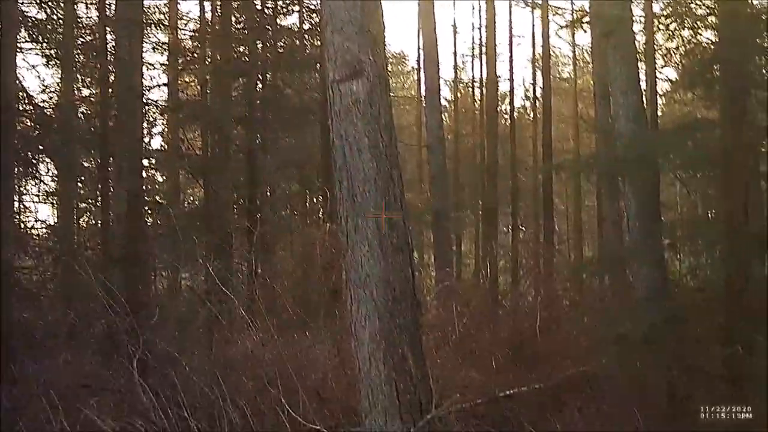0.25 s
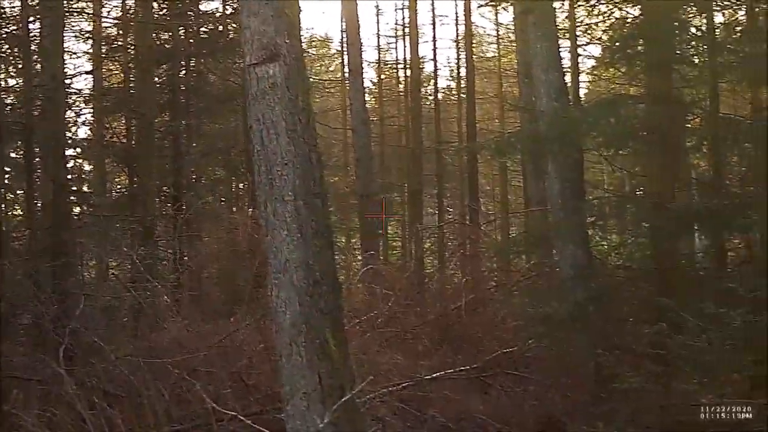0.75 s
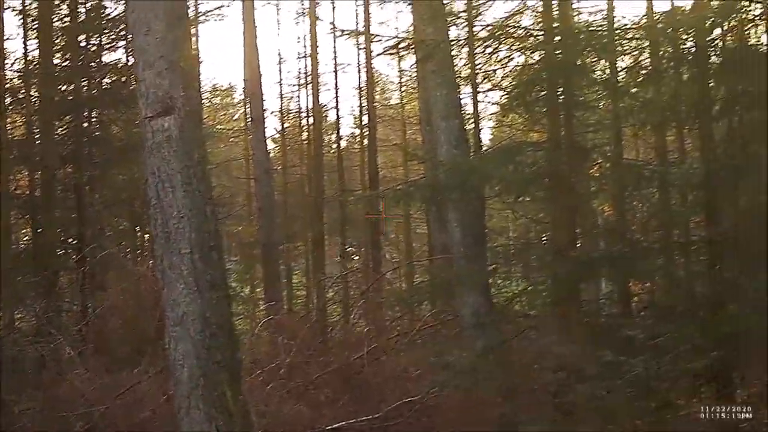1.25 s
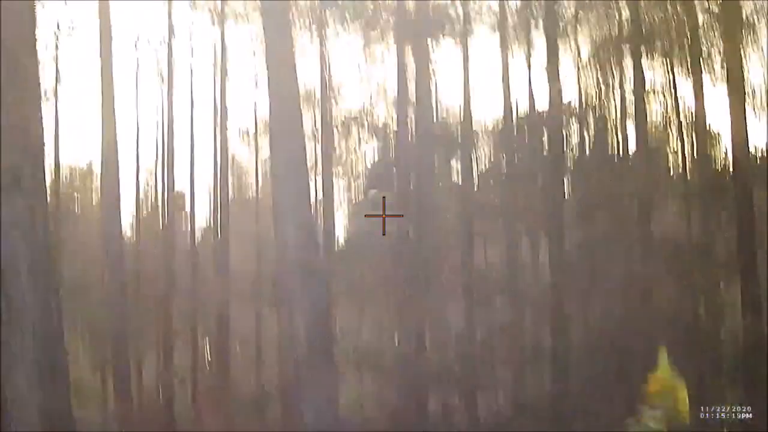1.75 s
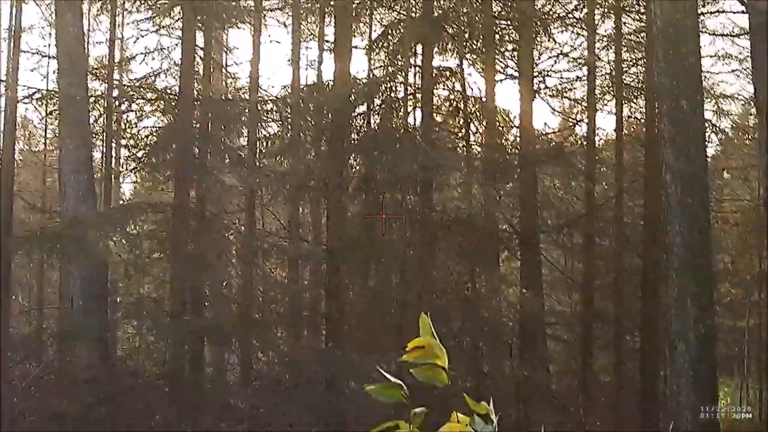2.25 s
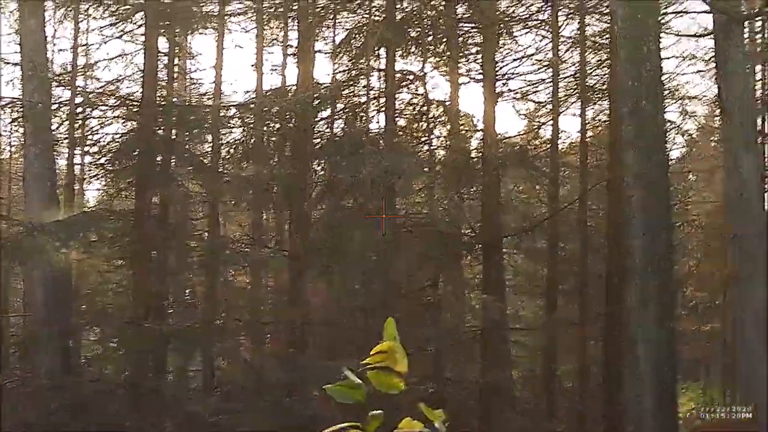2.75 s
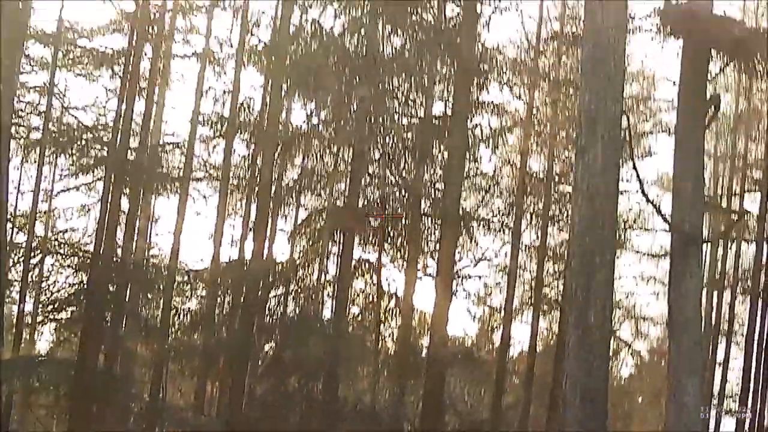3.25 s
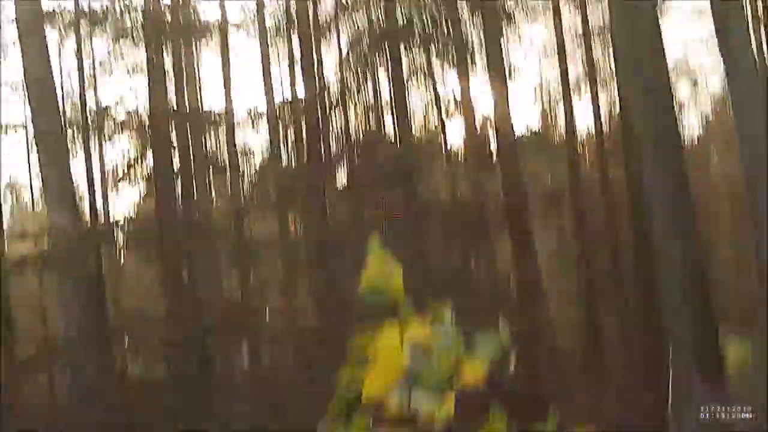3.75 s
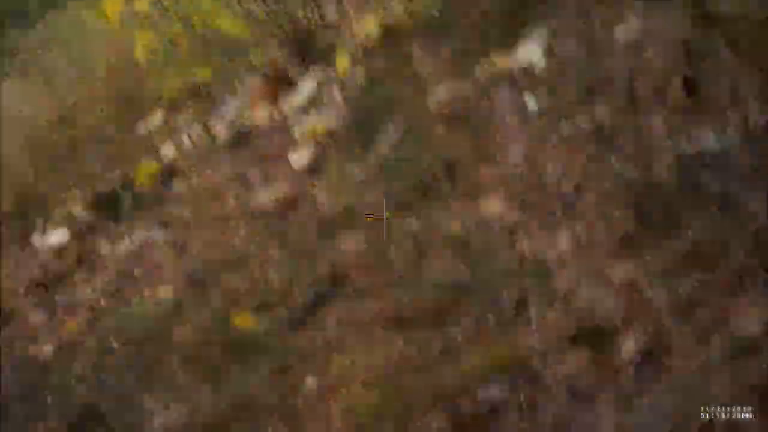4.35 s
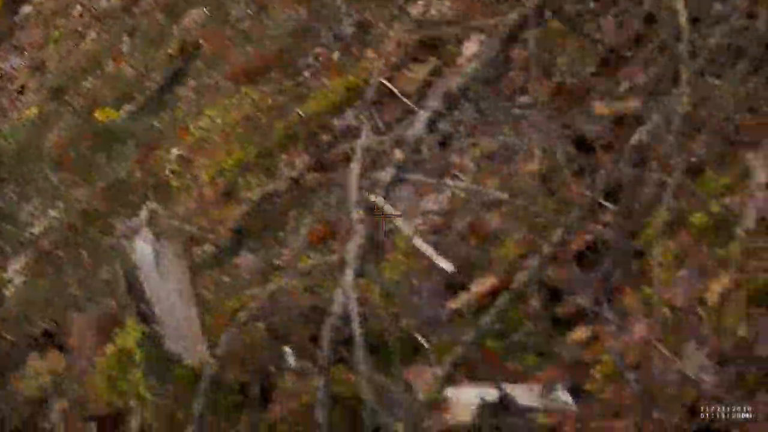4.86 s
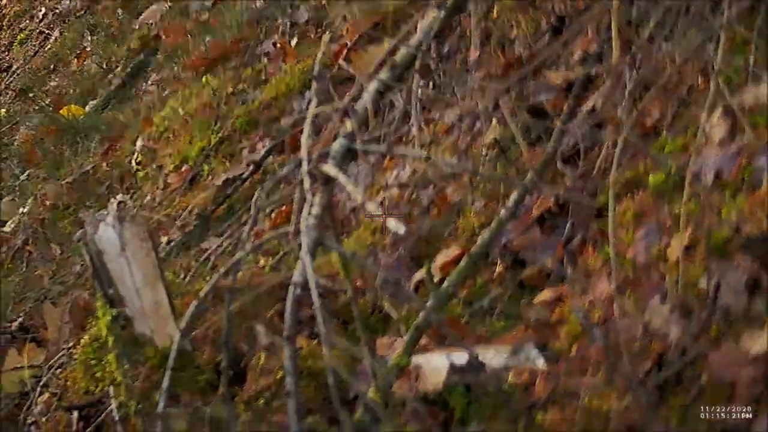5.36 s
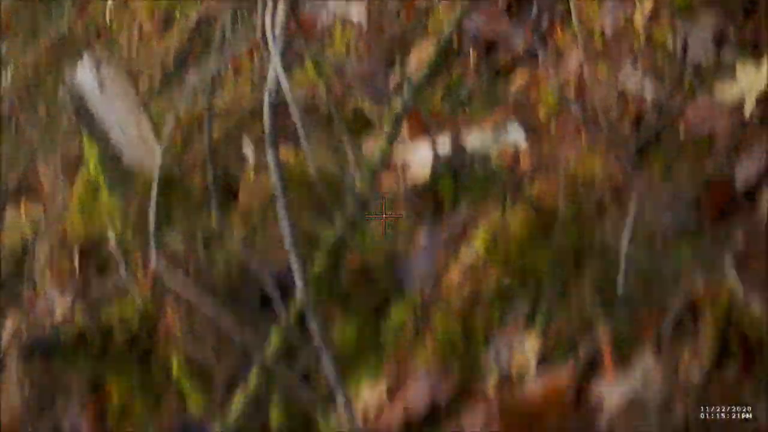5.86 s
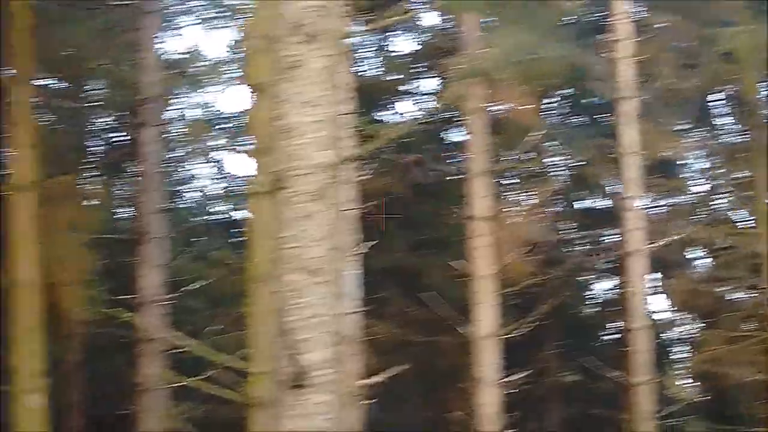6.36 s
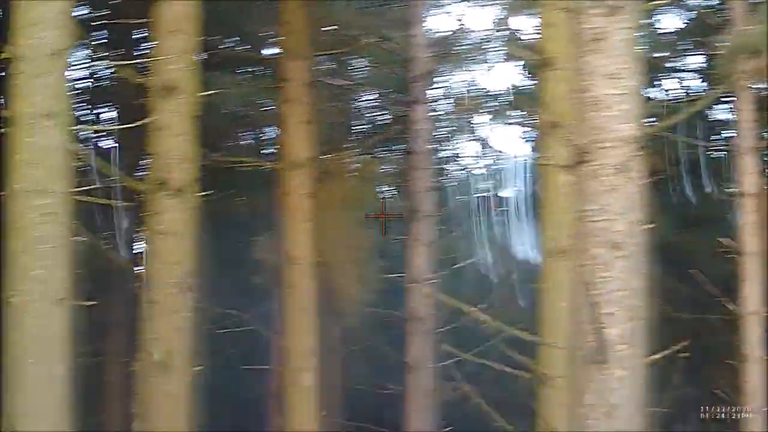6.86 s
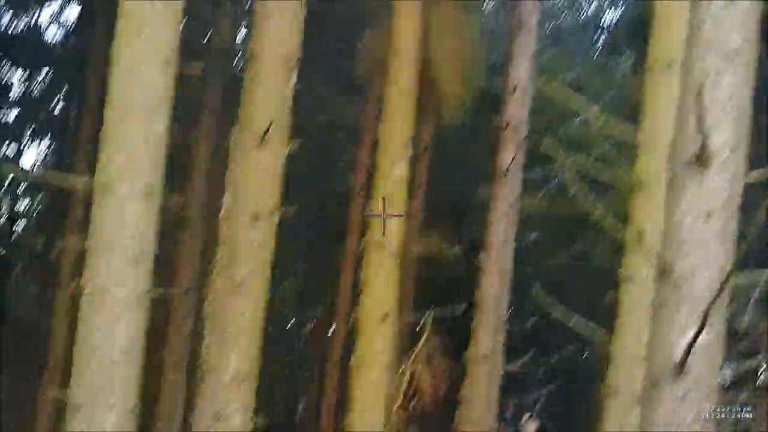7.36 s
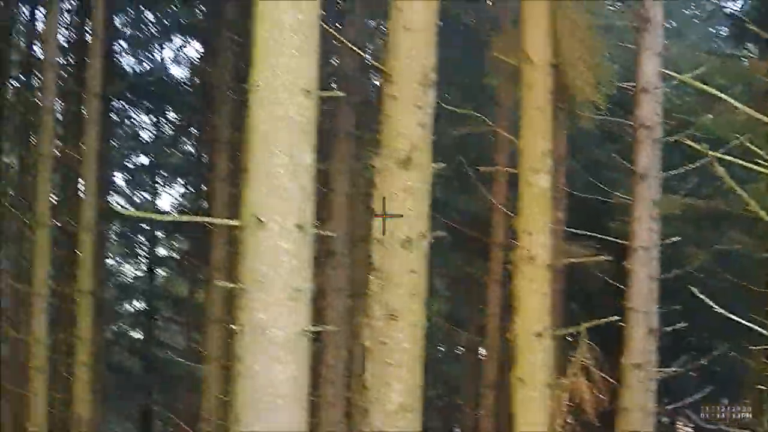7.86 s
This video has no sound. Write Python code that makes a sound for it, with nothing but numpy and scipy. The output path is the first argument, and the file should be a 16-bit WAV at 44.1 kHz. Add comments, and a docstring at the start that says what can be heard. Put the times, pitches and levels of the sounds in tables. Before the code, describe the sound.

Two overloading shotgun blasts echo through a forest, with quiet knocks, rubbing and steel clacks from the gun between them.

```python
"""First comes the dying echo of a shotgun shot in a conifer wood, heard by a small camera on the barrel.
Two more shots follow. Each blast jams the microphone amplifier at its limits; as it recovers,
the echo from the tree trunks rolls away, humming in the air inside the barrel.
Between shots, hands knock and rub the gun, its steel action clacks open and a tight part squeaks."""
import sys
import numpy as np
from scipy import signal
from scipy.fft import rfft, irfft, next_fast_len
from scipy.io import wavfile

SR = 44100
rng = np.random.default_rng(int(sys.argv[2]) if len(sys.argv) > 2 else 0)


def log_audio(samples):
    """Write samples as a 16-bit WAV file to the path given in sys.argv[1]."""
    # one column per channel
    frames = np.atleast_2d(samples).T
    # limit to full scale, then quantise
    limited = np.clip(frames, -1, 1)
    pcm = np.round(limited * 32767).astype(np.int16)
    wavfile.write(sys.argv[1], SR, pcm)


N = 357651
LEAD = SR // 2  # extra samples before time zero, to hold the earliest shot
T = np.arange(-LEAD, N) / SR  # scene time in seconds
AFTER = np.arange(SR // 3) / SR  # seconds since a hit
CLICK = signal.unit_impulse(len(AFTER))


def from_db(db):
    """Turn decibels into a number to multiply by."""
    return 10 ** (np.asarray(db) / 20)


def rms_one(x):
    """Scale a sound so its average strength (rms) is 1."""
    return x / np.sqrt(np.mean(x ** 2) + 1e-20)


def add(out, start, sound):
    """Mix a sound in at a start time in seconds."""
    i = LEAD + round(start * SR)
    out[i:i + len(sound)] += sound[:len(out) - i]


def low_pass(x, hz, order=2):
    """Soften everything above hz."""
    return signal.sosfilt(signal.butter(order, min(hz, .45 * SR), fs=SR, output="sos"), x)


def high_pass(x, hz, order=1):
    """Soften everything below hz."""
    return signal.sosfilt(signal.butter(order, hz, "high", fs=SR, output="sos"), x)


def filtered(x, gain_at):
    """Turn each frequency up or down by gain_at(hz)."""
    size = next_fast_len(len(x))
    hz = np.maximum(np.fft.rfftfreq(size, 1 / SR), 1)
    return irfft(rfft(x, size) * gain_at(hz), size)[:len(x)]


def ring(x, hz, t60):
    """Each push in x starts a pure tone that fades by 60 dB in t60 seconds."""
    decay, step = from_db(-60 / (t60 * SR)), 2 * np.pi * hz / SR
    return signal.lfilter([0, np.sin(step)], [1, -2 * decay * np.cos(step), decay * decay], x + 1e-18)


# The notes of the air in the barrel. Each row: pitch in Hz, width in Hz, boost in dB.
BARREL_NOTES = [(197, 22, 19), (604.7, 46, 17.5), (1010, 110, 3)]
def through_barrel(colour):
    """Noise with a given balance of low and high, boosted where the barrel hums like a closed pipe."""
    points, level_db = np.transpose(colour)
    balance = lambda hz: from_db(np.interp(np.log(hz), np.log(points), level_db))
    plain = filtered(rng.standard_normal(len(T)), balance)
    boost = lambda hz: 1 + sum(from_db(db) ** 2 / (1 + (2 * (hz - pitch) / width) ** 2)
                               for pitch, width, db in BARREL_NOTES)
    return rms_one(filtered(plain, lambda hz: np.sqrt(boost(hz))))


# The tone of a fresh echo. Each row: frequency in Hz, relative level in dB.
ECHO_TONE = [(30, -16), (80, -17), (140, -5), (280, -9), (420, -17), (750, -15), (1200, -20), (1700, -26),
             (2300, -32.5), (3000, -40), (3800, -43), (5000, -54), (7500, -59)]
# A far slope returns each shot once more: delay in seconds, spread in seconds, relative level in dB.
SLOPE_ECHO = (1.44, .07, -27)
def forest_echo(fall_db=39, dying_db_per_s=1.0, treble_loss_db=8.0, flutter_db=2.4):
    """Trunks scatter each shot back. The echo holds, then fades, duller the further it has travelled."""
    level, age = np.zeros((2, len(T)))
    far_s, far_spread_s, far_db = SLOPE_ECHO
    for fired, *_, echo_db, hold_s in GUNSHOTS:
        since = np.maximum(T - fired, 0)
        # after the hold, the echo loses fall_db each time it gets ten times older
        faded_db = fall_db * np.log10(np.hypot(1, (since / hold_s) ** 2)) / 2 + dying_db_per_s * since
        far = from_db(far_db) * np.exp(-((since - far_s) / far_spread_s) ** 2)
        level = np.where(T >= fired, from_db(echo_db) * np.hypot(from_db(-faded_db), far), level)
        age = np.where(T >= fired, since, age)
    noise = through_barrel(ECHO_TONE)
    travel = np.log(np.maximum(age, .22) / .33)
    bands_hz, out = np.geomspace(500, 8000, 5), 0
    for centre, share in zip(bands_hz, np.eye(len(bands_hz))):
        band = filtered(noise, lambda hz: np.interp(hz, bands_hz, share))
        out += band * from_db(-treble_loss_db * travel * (centre - bands_hz[0]) / (centre + 1500))
    flutter = rms_one(low_pass(rng.standard_normal(len(T)), 35))
    return level * out * from_db(flutter_db * flutter)


# The tone of the still wood. Each row: frequency in Hz, relative level in dB.
AIR_TONE = [(25, 3), (70, -8), (140, -5), (300, -17), (600, -21), (1100, -23), (2000, -31), (7500, -44)]
def still_air():
    """The faint, steady hush of the wood hums in the barrel."""
    return from_db(-60) * through_barrel(AIR_TONE)


# The gun's low and high notes. Each row: pitch in Hz, relative level in dB, ring time in seconds.
KNOCK_NOTES = [(425, -13, .03), (600, -6, .025), (754, -2, .035), (960, 1, .03), (1096, 2, .03),
               (1300, -4, .04), (1570, -8, .05), (1890, -9, .06), (2060, -9, .05), (2220, -9, .045)]
TICK_NOTES = [(2700, -4, .025), (3220, -1, .05), (3480, 0, .065), (4010, -3, .06), (4990, -6, .02),
              (5500, -8, .02), (6360, -13, .06), (7150, -13, .025)]
def strike(notes, rattle_s, grit, soft_hz, rise_s=.0003, uneven_db=2.0):
    """A hit chatters and rings each note by a chance amount; grit mixes in the chatter itself."""
    force = rng.standard_normal(len(AFTER)) * np.exp(-AFTER / rattle_s) * (1 - np.exp(-AFTER / rise_s))
    force = high_pass(force, notes[0][0], order=2)  # stiff steel passes little below its lowest note
    body = sum(from_db(db + uneven_db * rng.standard_normal()) * (-1) ** k * rms_one(ring(force, hz, t60))
               for k, (hz, db, t60) in enumerate(notes))
    chatter = rms_one(low_pass(force, notes[-1][0]))
    sound = low_pass(rms_one(body) + grit * chatter, soft_hz)
    return sound / np.sqrt(np.mean(sound[:SR // 100] ** 2))  # strength 1 over the first 10 ms


# Light touches. Each row: time in seconds, knock and tick levels in dB before the gains below.
TOUCHES = [(0.249, -37, -52), (2.137, -29, -59), (2.568, -38, -48.5), (2.647, -38, -64), (2.672, -36, -58),
           (4.078, -48, -76), (4.161, -40, -70), (4.202, -38, -58), (4.216, -43, -70), (4.726, -48, -71),
           (5.02, -40, -70), (5.17, -51, -72), (5.307, -33, -63), (5.649, -43, -80), (5.729, -49, -80),
           (5.927, -50, -80), (6.203, -36, -71), (7.526, -36, -44), (7.579, -35, -50), (7.613, -27, -46),
           (7.641, -33, -41.5), (7.674, -31, -58)]
def touches(knock_gain_db=-9.0, tick_gain_db=-6.5):
    """Hands and fittings tap the gun, each with a dull knock and a small tick."""
    out = np.zeros(len(T))
    for time, knock_db, tick_db in TOUCHES:
        knock = strike(KNOCK_NOTES, rattle_s=.007, grit=.35, soft_hz=750, rise_s=.002, uneven_db=3)
        tick = strike(TICK_NOTES, rattle_s=.005, grit=1.2, soft_hz=4500, rise_s=.002, uneven_db=4)
        add(out, time - .003, from_db(knock_db + knock_gain_db) * knock)
        add(out, time - .001, from_db(tick_db + tick_gain_db) * tick)
    return out


# Soft bumps. Each row: start in seconds, barrel level in dB, stock level in dB.
BUMPS = [(0.371, -33, -32), (2.136, -17, -34), (5.31, -26, -38), (5.389, -42, -28), (5.56, -29, -21),
         (5.649, -50, -36), (6.203, -35, -37), (7.378, -19, -26)]
def thuds(overtone_loss_db=7.0, soft_hz=800):
    """A bump sets the barrel's air and the stock (the gun's shoulder piece) booming."""
    out = np.zeros(len(T))
    barrel = sum(from_db(-overtone_loss_db * k) * ring(CLICK, hz, t60=2.8 / width)
                 for k, (hz, width, _) in enumerate(BARREL_NOTES))
    stock = ring(CLICK, hz=132, t60=.11)
    for start, barrel_db, stock_db in BUMPS:
        add(out, start, low_pass(from_db(barrel_db) * barrel + from_db(stock_db) * stock, soft_hz))
    return out


# Loose parts landing. Each row: start in seconds, level in dB, pitch in Hz.
LOOSE_PARTS = [(0.372, -28, 880), (4.323, -42, 565), (4.527, -37, 398), (4.527, -38, 950),
               (7.675, -23, 900)]
def clunks(soft_hz=1600):
    """A loose part drops into its seat and rings briefly."""
    out = np.zeros(len(T))
    for start, db, hz in LOOSE_PARTS:
        add(out, start, from_db(db) * low_pass(ring(CLICK, hz, t60=.055), soft_hz))
    return out


# The shots. Each row: when it fires, when the shoulder stops the kick, when the amplifier comes free
# and its recovery time, all in seconds; kick, crack and echo levels in dB; echo hold in seconds.
GUNSHOTS = [(-.36, -.30, -.14, .04, -10, 3, -26.5, .325), (1.939, 1.992, 2.124, .02, -11, 6, -27.5, .28),
            (7.134, 7.1994, 7.366, .045, -16, 13, -29, .46)]
def blasts(mount_db=26, shock_db=36, shock_s=.0017, crack_s=.009, crack_hz=3000):
    """Each shot jolts the gun, blasts from the muzzle and kicks back into the shoulder."""
    out = np.zeros(len(T))
    for fired, stopped, _, _, kick_db, crack_db, *_ in GUNSHOTS:
        # the charge jolts the gun
        add(out, fired, from_db(-14) * ring(CLICK, hz=150, t60=.086))
        add(out, fired, from_db(-23) * strike(KNOCK_NOTES, rattle_s=.008, grit=.3, soft_hz=1000))
        # the blast arrives and shakes the camera mount, far beyond what the amplifier can take
        arrival = fired + .007
        crack = rms_one(low_pass(rng.standard_normal(len(AFTER)), crack_hz)) * np.exp(-AFTER / crack_s)
        mount = ring(CLICK, hz=143, t60=.11)
        add(out, arrival, from_db(crack_db) * crack - from_db(mount_db) * mount)
        add(out, arrival + .0009, from_db(shock_db) * np.exp(-AFTER / shock_s))
        # the stock lands in the shoulder: a thump, a rattle and a ring of steel
        knock = strike(KNOCK_NOTES, rattle_s=.009, grit=.5, soft_hz=1800)
        add(out, stopped, from_db(kick_db) * (.7 * knock - ring(CLICK, hz=115, t60=.1)))
        add(out, stopped, from_db(-36) * strike(TICK_NOTES, rattle_s=.008, grit=.9, soft_hz=5000))
        add(out, stopped, from_db(-16) * ring(CLICK, hz=1350, t60=.12))
    return out


LIMIT = .49  # the amplifier jams at this level, up or down
def bias_swing(depth=6.0, rise_s=.021, cross_s=.011, edge_s=.006):
    """A blast throws the amplifier's resting level (its bias) up, then down; it creeps back."""
    out = np.zeros(len(T))
    for fired, stopped, free, recovery, *_ in GUNSHOTS:
        crossed = stopped + cross_s
        up = np.interp(T, [fired + .0062, fired + .0076 + rise_s, stopped - edge_s, stopped, crossed],
                       [0, depth, depth, LIMIT * .5, 0])
        down = np.interp(T, [stopped, crossed, crossed + edge_s, free - .03, free],
                         [0, LIMIT * .3, depth, depth, LIMIT])
        out += up - down * np.exp(-np.maximum(T - free, 0) / recovery)
    return out


def amplifier(sound, leak_db=-35, leak_limit=3.0, sag_hz=1.4):
    """Loud sound jams it; a capacitor lets the jammed level sag, and a little treble leaks past."""
    jammed = np.clip(sound + bias_swing(), -LIMIT, LIMIT)
    leak = from_db(leak_db) * np.clip(high_pass(sound, 1300, order=4), -leak_limit, leak_limit)
    return np.clip(high_pass(1.04 * jammed, sag_hz), -LIMIT, LIMIT) + leak


# Steel hitting steel. Each row: start in seconds, knock level in dB, tick level in dB.
STEEL_HITS = [(2.014, -22, -33), (5.558, -18, -32.5), (5.5862, -34, -35), (7.223, -8, -15)]
def clacks():
    """The moving parts of the gun's action strike each other, hard and bright."""
    out = np.zeros(len(T))
    for start, knock_db, tick_db in STEEL_HITS:
        knock = strike(KNOCK_NOTES, rattle_s=.0035, grit=.4, soft_hz=2600, uneven_db=1.5)
        tick = strike(TICK_NOTES, rattle_s=.006, grit=.8, soft_hz=5500, uneven_db=1.5)
        add(out, start, from_db(knock_db) * knock + from_db(tick_db) * tick)
    return out


# Spells of moving the gun. Each row: start and end in seconds, then rumble, rub and jingle levels in dB.
MOVEMENTS = [(3.33, 3.44, -66, -62, -75), (3.8, 3.88, -64, -62, -85), (4.07, 4.33, -63, -64, -82),
             (4.5, 5.26, -61, -73, -86), (5.4, 5.75, -55, -65, -88), (5.88, 6.2, -59, -75, -84),
             (7.52, 7.69, -45, -45, -60), (7.72, 7.92, -47, -56, -80)]
def moving(fade_s=.025, catches_per_s=400, grain_db=3.0, grit=.7):
    """Arms send a rumble up the barrel, hands rub it in small catches and a fitting jingles."""
    catches = rng.random(len(T)) < catches_per_s / SR
    strength = from_db(grain_db * np.minimum(rng.exponential(1, len(T)), 3))
    force = rng.standard_normal(len(T)) * low_pass(catches * strength, 60, order=1)
    body = sum(from_db(db) * (-1) ** k * rms_one(ring(force, hz, t60))
               for k, (hz, db, t60) in enumerate(KNOCK_NOTES))
    deep_noise = low_pass(rng.standard_normal(len(T)), 150, order=3)
    rumble = rms_one(high_pass(deep_noise, 55, order=2))
    rub = rms_one(low_pass(rms_one(body) + grit * rms_one(force), 700))
    jingle = rms_one(ring(force, hz=3250, t60=.008))
    out = np.zeros(len(T))
    for start, end, rumble_db, rub_db, jingle_db in MOVEMENTS:
        fade = np.exp(-np.abs(T - np.clip(T, start, end)) / fade_s)
        out += fade * (from_db(rumble_db) * rumble + from_db(rub_db) * rub + from_db(jingle_db) * jingle)
    return out


# The gun swings down: middle in seconds, spread in seconds, level in dB.
DOWNSWING = (3.8, .25, -58)
def swinging():
    """Air blowing across the muzzle makes the barrel hum softly."""
    middle, spread, db = DOWNSWING
    return from_db(db) * np.exp(-((T - middle) / spread) ** 2) * through_barrel(ECHO_TONE)


# One squeak: start and length in seconds, level in dB, first and last pitch in Hz.
TIGHT_PART = (4.255, .048, -45, 490, 600)
def squeak(jitter=.09, overtone_loss_db=13.0):
    """A tight part sticks and slips as it slides home: a shaky, rising tone that swells and fades."""
    start, length, db, first_hz, last_hz = TIGHT_PART
    out, progress = np.zeros(len(T)), np.linspace(0, 1, int(length * SR))
    wobble = rms_one(low_pass(rng.standard_normal(len(progress)), 400))
    hz = (first_hz + (last_hz - first_hz) * progress) * (1 + jitter * wobble)
    phase = 2 * np.pi * np.cumsum(hz) / SR
    tone = sum(from_db(-overtone_loss_db * np.log2(k)) * np.sin(k * phase) for k in range(1, 8))
    add(out, start, from_db(db) * rms_one(tone) * np.sin(np.pi * progress))
    return out


def scene():
    """The wood, the shots and the handling all pass through the microphone amplifier."""
    outdoors = still_air() + blasts() + forest_echo()
    handling = touches() + thuds() + clunks() + clacks() + squeak() + moving() + swinging()
    return amplifier(outdoors + handling)[None, LEAD:]


# A short silence: start and end in seconds.
DROPOUT = (6.227, 6.451)
def record(dry, hiss_db=-72, tick_db=-35, cutoff_hz=7750):
    """Add faint hiss and cut the highest treble; the sound drops out once and returns with a tick."""
    t = T[LEAD:]
    gone, back = DROPOUT
    hiss = from_db(hiss_db) * rng.standard_normal(N)
    tick = from_db(tick_db) * (t > back) * np.exp(-np.abs(t - back) / .06)
    out = (dry + hiss + tick) * ((t < gone) | (t > back))
    return signal.fftconvolve(out, signal.firwin(161, cutoff_hz, fs=SR)[None], "same")


dry = scene()
out = record(dry)
log_audio(out)
```